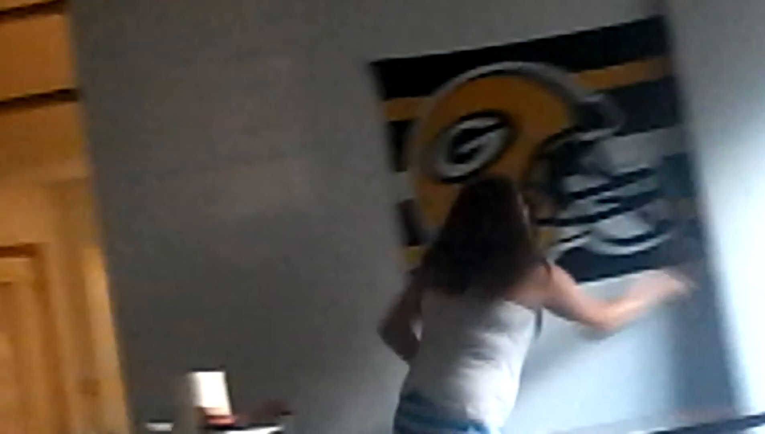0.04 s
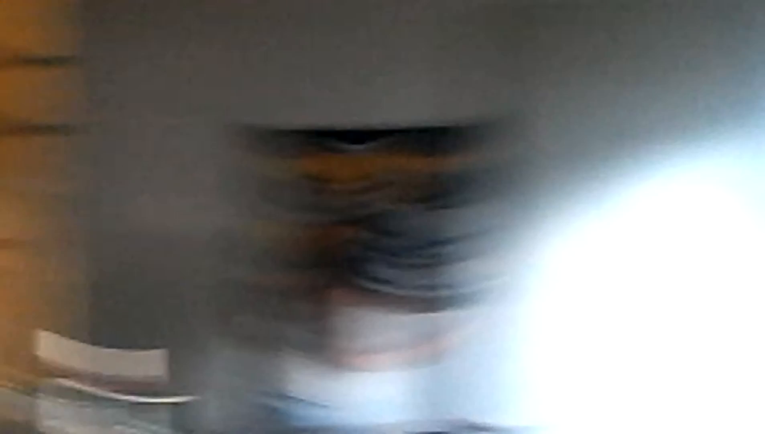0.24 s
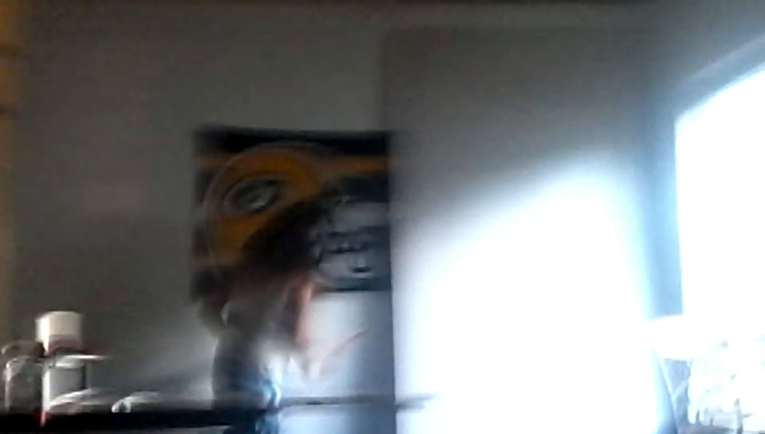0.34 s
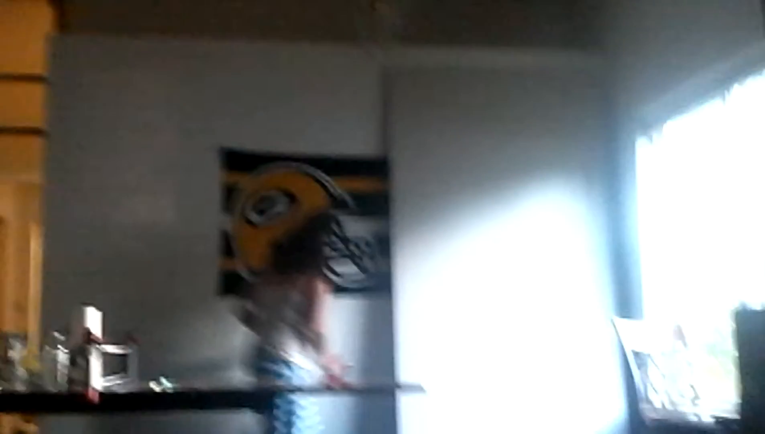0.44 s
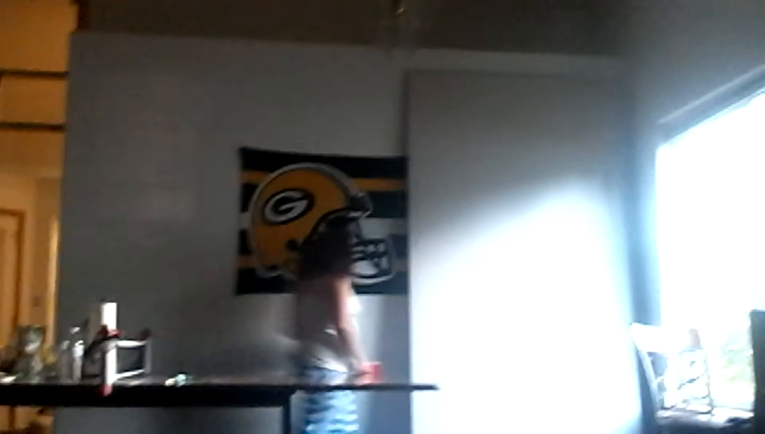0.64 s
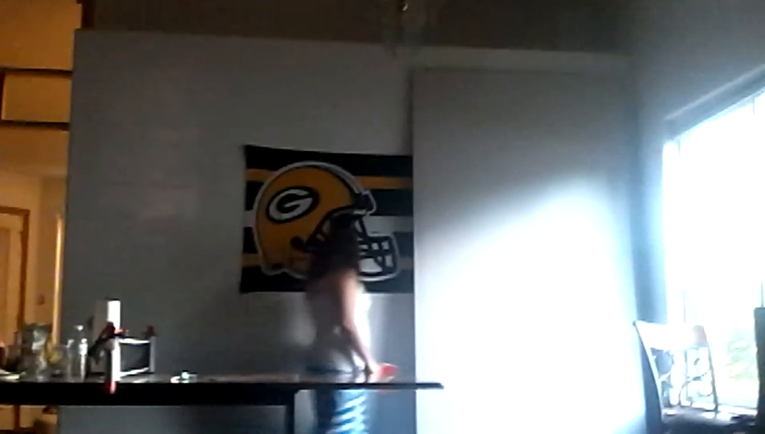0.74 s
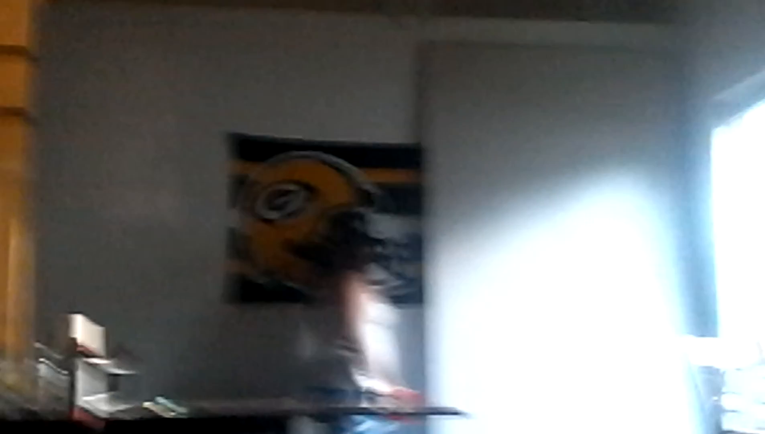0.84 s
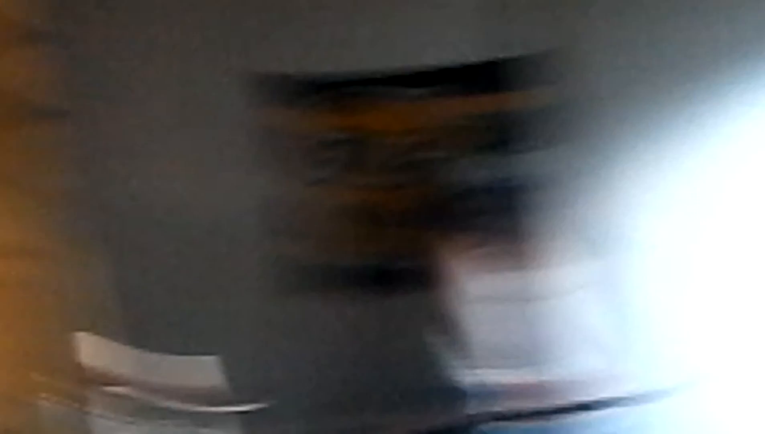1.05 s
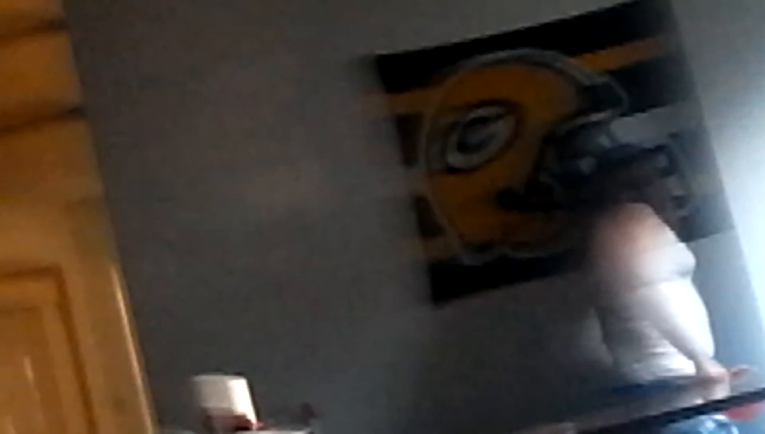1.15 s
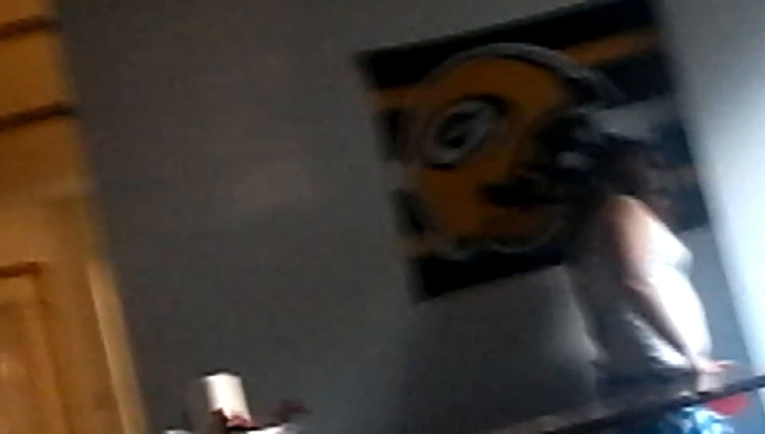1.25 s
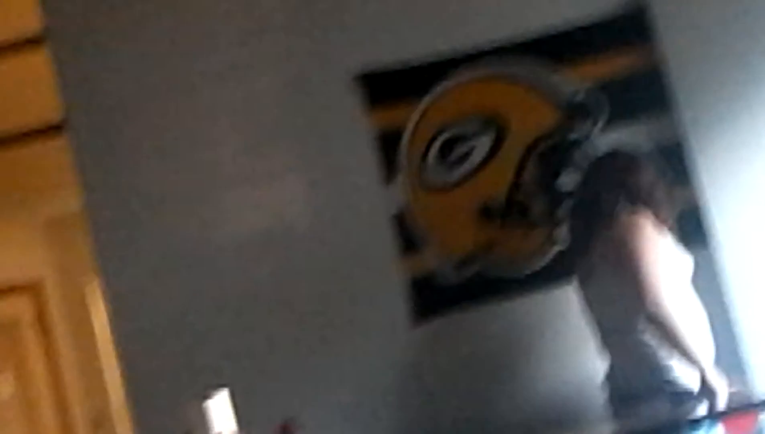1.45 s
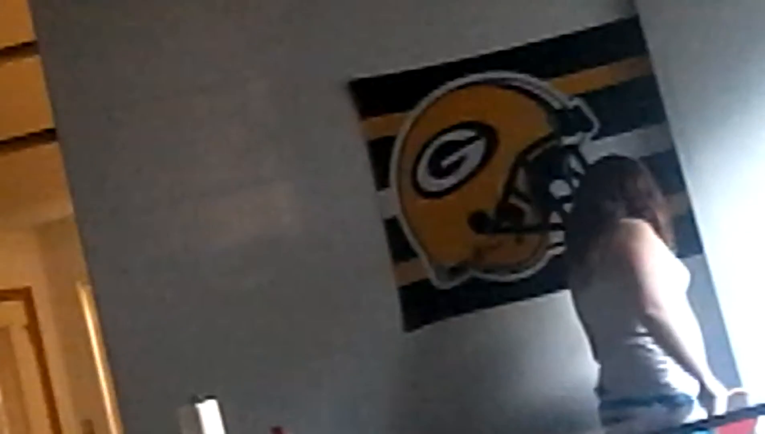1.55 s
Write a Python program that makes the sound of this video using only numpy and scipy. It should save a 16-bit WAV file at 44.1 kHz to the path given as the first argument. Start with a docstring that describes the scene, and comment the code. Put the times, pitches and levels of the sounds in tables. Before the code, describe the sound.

Table tennis in a bare room: a stamping, sliding shoe, a paddle hit, a bounce.

```python
"""Table tennis in a bare room

A player stamps and slides a shoe, the paddle strikes the ball, and the ball grazes and knocks on the
table; its thin shell pings above each knock and the room rings on. A dry tick and a soft, distant tap
of the ball come first. Lighter scuffs and footfalls lie between the hits, over a faint hum and hiss."""
import sys
import numpy as np
from scipy import signal
from scipy.fft import rfft, irfft
from scipy.io import wavfile

SR = 44100
rng = np.random.default_rng(int(sys.argv[2]) if len(sys.argv) > 2 else 0)


def transcribe(u):
    """Save the signal u as a 16-bit wav file named by the first command-line argument.

    u: samples, shape (n,) or (channels, n), limited to [-1, 1]; the rate is SR.
    q: integer samples, one column per channel.
    """
    v = np.clip(np.atleast_2d(u).T, -1, 1)
    q = np.round(v * 32767).astype(np.int16)
    wavfile.write(sys.argv[1], SR, q)


N = 70560

# the room's ring (f/Hz, t60/s)
ROOM_DECAY = [(120, 0.67), (320, 0.43), (840, 0.56), (1500, 0.57), (3000, 0.66), (6000, 0.48), (9000, 0.35),
              (11000, 0.3), (15000, 0.22)]
# hum lines (f/Hz, level/dB)
HUM_LINES = [(145, -81), (312, -76.5), (390, -76), (538, -79.5), (786, -84.5)]
# EQ curves for the hiss, the close tick and the hollow far tap (f/Hz, relative level/dB)
HISS_COLOUR = [(20, -27), (45, -21), (80, -5), (140, 1), (210, -9), (330, -2), (560, -12), (1050, -7.5),
               (2000, -16.5), (3200, -20), (6300, -16.5), (8000, -39), (11000, -35.5), (12500, -46),
               (15500, -49)]
TICK_COLOUR = [(200, -5), (700, 2.5), (1300, 1.5), (2500, -6), (5000, 2.5), (7000, -12), (8500, -14),
               (11000, -23), (12500, -45)]
TAP_COLOUR = [(60, -36), (200, -17.5), (360, 3.5), (520, -10.5), (730, -8), (880, 4.5), (1130, -9.5),
              (1330, -12), (1600, -1.5), (1950, -28), (2750, -9), (4000, -21), (6000, -17), (7800, -40),
              (9000, -31.5), (12000, -58), (15000, -71)]

# a sole sliding on the floor (t/s, rise/s, fall/s, rub level/dB, grit level/dB)
SCUFFS = [(0, 0.0022, 0.01, -48, -70), (0.218, 0.021, 0.1, -37.5, -56), (0.275, 0.0222, 0.0023, -23, -59),
          (0.85, 0.021, 0.0063, -51.5, -42.5), (0.876, 0.01, 0.0035, -36, -53),
          (1.442, 0.024, 0.017, -49.5, -57)]
# its midrange rub and gritty treble (f/Hz, relative level/dB)
RUB_COLOUR = [(200, -30), (900, -8), (1700, 4.5), (3200, 4), (4500, 1.5), (6300, -3), (7600, -12.5),
              (11000, -31.5), (12500, -71), (15000, -95)]
GRIT_COLOUR = [(3000, -22), (4500, -2), (6000, -2.5), (8000, -13.5), (9000, -5), (10300, -4.5),
               (11300, -13), (12300, -19), (15000, -19.5)]
# weight landing on the floor (t/s, rise/s, fall/s, thud level/dB, clap level/dB)
STEPS = [(0.231, 0.014, .013, -21.5, -20.5), (0.284, 0.017, 0.0098, -28.5, -22),
         (0.675, 0.0095, 0.018, -40, -70), (0.895, 0.016, 0.0097, -46.5, -77),
         (1.11, 0.046, 0.014, -58, -64)]
# low thud and clap of the sole (f/Hz, relative level/dB)
THUD_COLOUR = [(30, -20), (70, -35.5), (110, -5.5), (200, -3.5), (250, -3.5), (320, 2), (390, 1.5),
               (500, -8.5), (800, -9), (2000, -41), (8000, -62)]
CLAP_COLOUR = [(150, -27), (350, 1), (700, 4), (1000, -0.5), (1280, -1.5), (1600, -5), (2100, -7),
               (5000, -16.5), (12000, -55)]

# ring of the ball's shell (f/Hz, width/Hz, relative level/dB batted, relative level/dB bounced)
SHELL_MODES = [(6010, 570, 1.5, -22), (6910, 920, -34, -6), (8895, 750, 2.5, 3), (10040, 1400, -1, -0.5),
               (11150, 950, -5.5, -6.5), (13200, 4300, -14.5, -15.5)]
# the short knock that arrives first (f/Hz, relative level/dB, t60/s)
PADDLE_MODES = [(282.6, -11.5, 0.072), (980, -23, 0.06), (1620, 14.5, 0.0098), (1944, 9.5, 0.017)]
TABLE_MODES = [(539, -16.5, 0.071), (1180, -23, 0.024), (1956, 5, 0.0095), (3210, -2, 0.011)]
# what each blow radiates into the room (f/Hz, relative level/dB)
PADDLE_COLOUR = [(60, -29), (150, -16), (280, 2.5), (400, -5), (540, -6), (750, -6.5), (950, 2),
                 (1150, -0.5), (1500, 2), (2050, -7), (2650, -19.5), (3300, -23), (4700, -21.5),
                 (7000, -27.5), (15000, -31)]
TABLE_COLOUR = [(60, -33), (170, -14.5), (260, -5), (380, -12.5), (520, -3), (780, -2.5), (950, 2.5),
                (1400, -2.5), (2050, -5), (2650, -24.5), (3250, -13), (3700, -11.5), (4300, -24),
                (5200, -19.5), (7700, -31), (15000, -41)]
# balance of each blow (knock level/dB, wash level/dB, ping level/dB)
PADDLE_MIX, GRAZE_MIX, BOUNCE_MIX = (-0.98, 9.67, -9), (-27, -7, -42), (-1.8, 6.6, -7)


def amp(db):
    """Decibels to gain."""
    return 10 ** (np.asarray(db) / 20)


def unit(x):
    """Scales a sound to an energy of one."""
    return x / np.sqrt(np.sum(x ** 2) + 1e-20)


def read(points, hz):
    """Reads a curve along a log-frequency axis."""
    f, value = np.transpose(points)
    return np.interp(np.log(hz + 1), np.log(f), value)


def through(x, response):
    """Convolves and cuts to the scene's length."""
    return signal.fftconvolve(x, response)[:N]


def placed(at_s, sound):
    """A sound set at its time in silence."""
    return np.concatenate([np.zeros(round(at_s * SR)), sound, np.zeros(N)])[:N]


def click(gain_db, size=4096):
    """A minimum-phase click of unit energy, its spectrum shaped by the function gain_db(hz)."""
    hz = abs(np.fft.fftfreq(size, 1 / SR))
    log_gain = np.log(amp(gain_db(hz)) + 1e-6)
    spectrum = np.exp(np.conj(signal.hilbert(log_gain)))
    return unit(np.fft.ifft(spectrum).real[:size // 2])


def coloured_click(colour):
    """A click shaped by an EQ curve."""
    return click(lambda hz: read(colour, hz))


def room_tone(hiss_db=-62.5):
    """The bed: steady hiss and a faint hum."""
    t = np.arange(N) / SR
    hiss_eq = amp(read(HISS_COLOUR, np.fft.rfftfreq(N, 1 / SR)))
    hiss = irfft(rfft(rng.standard_normal(N)) * hiss_eq, N)
    hum = sum(amp(db) * np.sqrt(2) * np.sin(2 * np.pi * (hz * t + rng.random())) for hz, db in HUM_LINES)
    return amp(hiss_db) * unit(hiss) * np.sqrt(N) + hum


def reverb(sound, predelay_s=0.0022, spread_db=3, early_db=0.5, early_s=0.06):
    """A sound's echoes at unit energy: uneven reflections, each band dying at its own speed."""
    t = np.arange(SR) / SR
    taps = rng.choice([-1., 1.], SR) * (rng.random(SR) < 1 / 4)
    taps *= amp(spread_db * rng.standard_normal(SR) + early_db * np.exp(-t / early_s))
    hz, age_s, bands = signal.stft(taps, SR, nperseg=256)
    decay = amp(-60 * age_s / read(ROOM_DECAY, hz)[:, None])
    tail = signal.istft(bands * decay, SR, nperseg=256)[1][:SR]
    return unit(through(sound, tail * (t > predelay_s)))


def close_tick(at_s, level_db):
    """A small dry tick right at the microphone."""
    return amp(level_db) * placed(at_s, coloured_click(TICK_COLOUR))


def pressure(at_s, rise_s, fall_s):
    """The force of a contact: a straight rise, then an exponential release."""
    t = np.arange(N) / SR - at_s
    return np.clip(t / rise_s, 0, 1) * np.exp(-np.maximum(t - rise_s, 0) / fall_s)


def contact(force, colour, grains_per_s=5000, spread_db=2.5, direct_db=-7):
    """Many tiny impacts under a force, coloured by the surface and heard through the room."""
    grains = rng.standard_normal(N) * amp(spread_db * rng.standard_normal(N))
    grains *= rng.random(N) < grains_per_s / SR
    surface = coloured_click(colour)
    response = placed(0, reverb(surface)) + amp(direct_db) * placed(0, surface)
    return through(force * unit(grains) * np.sqrt(N), response)


def far_tap(at_s, level_db):
    """A soft, hollow, distant tap of the ball, heard through the room."""
    return contact(amp(level_db) * pressure(at_s, rise_s=0.015, fall_s=0.0046), TAP_COLOUR)


def footwork(pushes, dark_colour, bright_colour):
    """Each push of a foot drives a darker and a brighter layer of floor contact."""
    dark = sum(amp(db) * pressure(*timing) for *timing, db, _ in pushes)
    bright = sum(amp(db) * pressure(*timing) for *timing, _, db in pushes)
    return contact(dark, dark_colour) + contact(bright, bright_colour)


def shell_ping(at_s, batted, t60_s=0.038, direct_db=-5):
    """The ball's thin shell rings in high bands: a short, close burst plus its echoes."""
    def resonance_db(f):
        peaks = sum(amp(bat_db if batted else bounce_db) / (1 + (2 * (f - hz) / width) ** 2) ** 2
                    for hz, width, bat_db, bounce_db in SHELL_MODES)
        return 20 * np.log10(peaks)

    t = np.arange(SR // 8) / SR
    shell = click(resonance_db)
    burst = rng.standard_normal(len(t)) * amp(-60 * t / t60_s)
    direct = unit(through(shell, burst))
    return placed(at_s, reverb(shell)) + amp(direct_db) * placed(at_s, direct)


def ball_hit(at_s, mix, modes, colour, batted=False, attack_s=0.0012, ping_lag_s=0.0045):
    """The ball meets paddle or table: a damped knock, a wash of echoes and the shell's ping."""
    knock_db, wash_db, ping_db = mix
    t = np.arange(SR // 8) / SR
    ring = sum(amp(db - 60 * t / t60) * np.sin(2 * np.pi * hz * t) for hz, db, t60 in modes)
    attack = 1 - np.exp(-(t / attack_s) ** 2)
    knock = placed(at_s, unit(ring * attack))
    ping = shell_ping(at_s + ping_lag_s, batted)
    wash = placed(at_s, reverb(coloured_click(colour)))
    return amp(knock_db) * knock + amp(wash_db) * wash + amp(ping_db) * ping


def scene():
    """The mono mix: ball and shoes up front, room tone underneath."""
    ball = ball_hit(0.4983, PADDLE_MIX, PADDLE_MODES, PADDLE_COLOUR, batted=True)
    ball += ball_hit(1.206, GRAZE_MIX, TABLE_MODES, TABLE_COLOUR)
    ball += ball_hit(1.2148, BOUNCE_MIX, TABLE_MODES, TABLE_COLOUR)
    steps = footwork(STEPS, THUD_COLOUR, CLAP_COLOUR)
    scuffs = footwork(SCUFFS, RUB_COLOUR, GRIT_COLOUR)
    tap = far_tap(at_s=0.2048, level_db=-20.5)
    tick = close_tick(at_s=0.0445, level_db=-23.5)
    return (ball + steps + scuffs + tap + tick + room_tone())[None]


def record(dry, cutoff_hz=15750):
    """A steep low-pass trims the very top of the mix."""
    lowpass = signal.firwin(511, cutoff_hz, window=("kaiser", 9), fs=SR)
    return signal.oaconvolve(dry, lowpass[None], "same")


dry = scene()
out = record(dry)
transcribe(out)
```